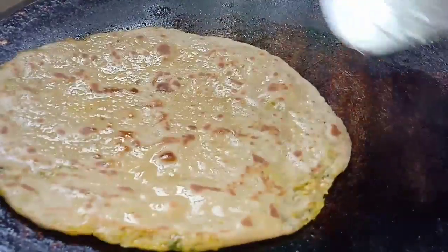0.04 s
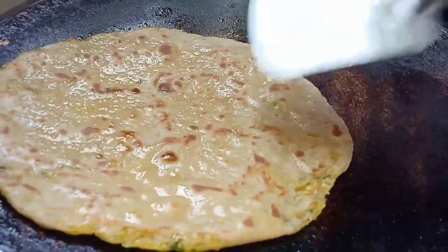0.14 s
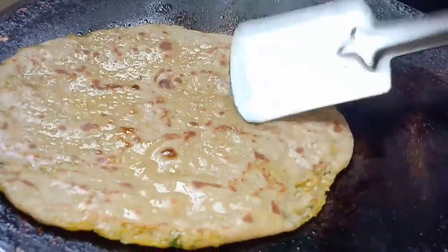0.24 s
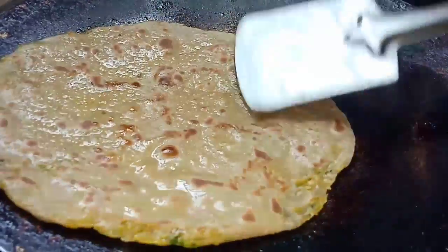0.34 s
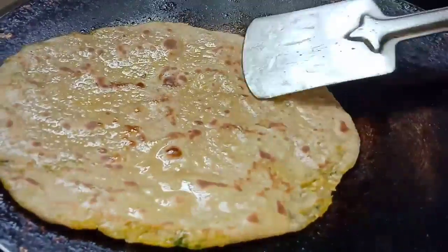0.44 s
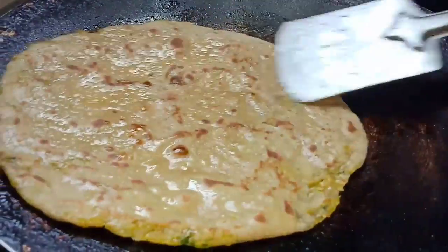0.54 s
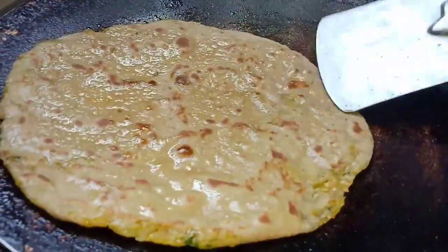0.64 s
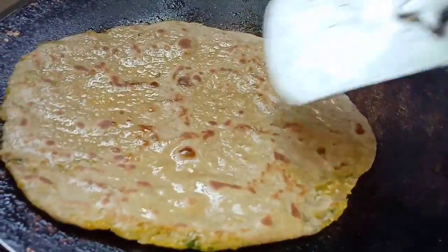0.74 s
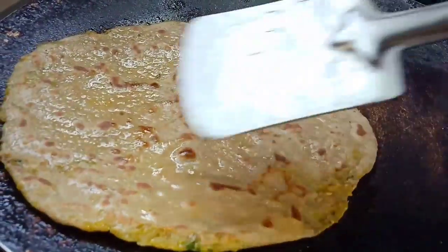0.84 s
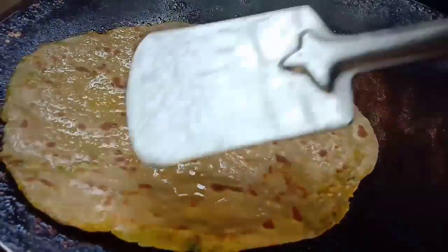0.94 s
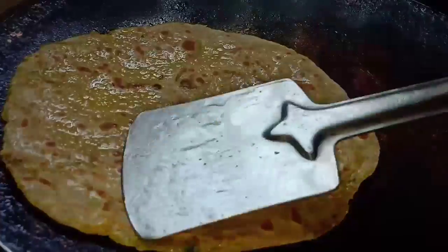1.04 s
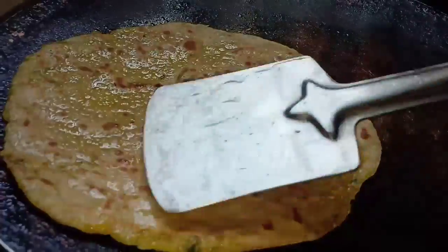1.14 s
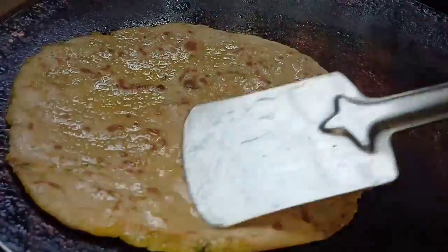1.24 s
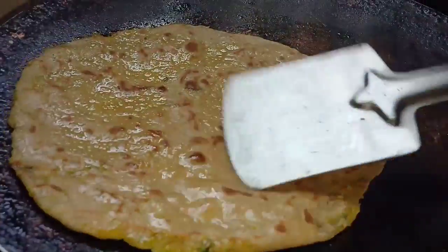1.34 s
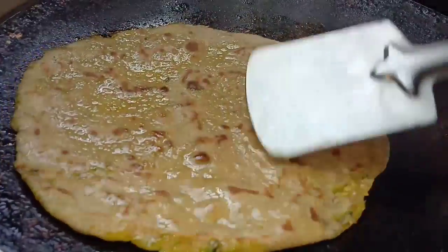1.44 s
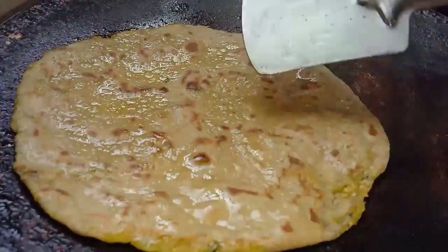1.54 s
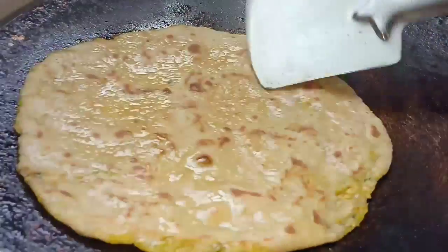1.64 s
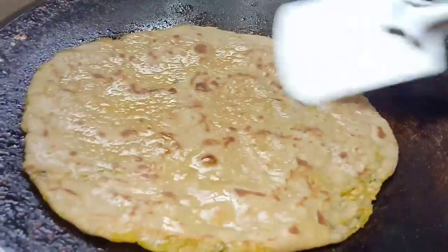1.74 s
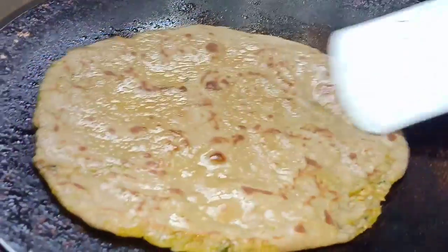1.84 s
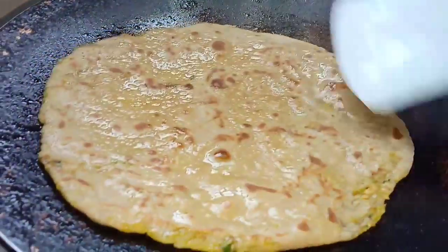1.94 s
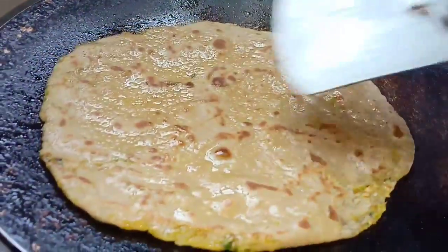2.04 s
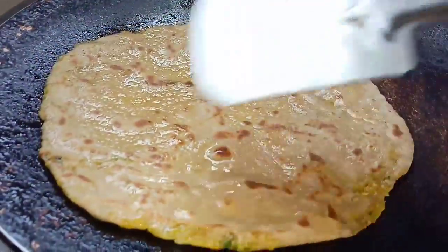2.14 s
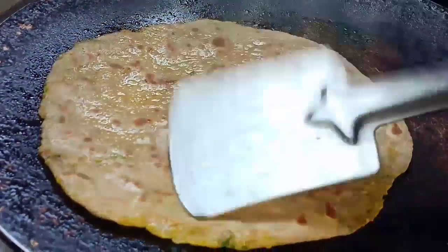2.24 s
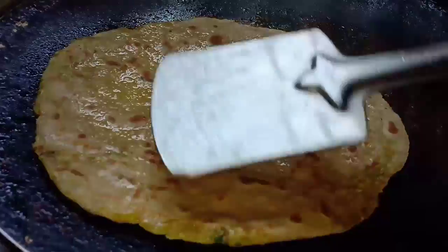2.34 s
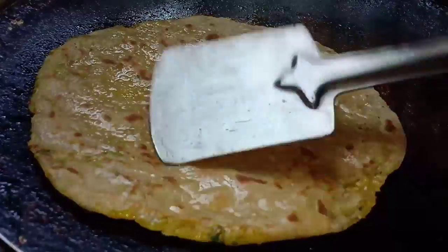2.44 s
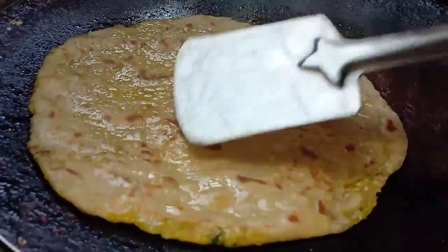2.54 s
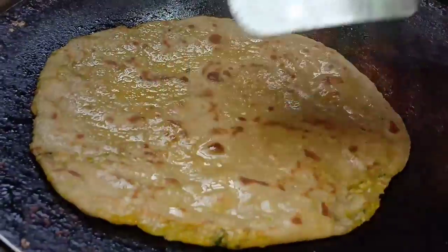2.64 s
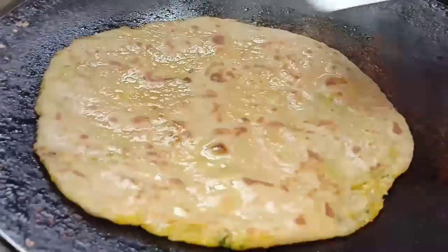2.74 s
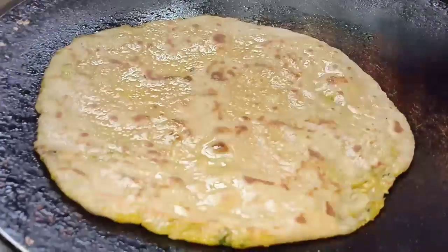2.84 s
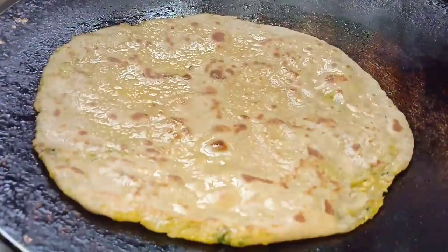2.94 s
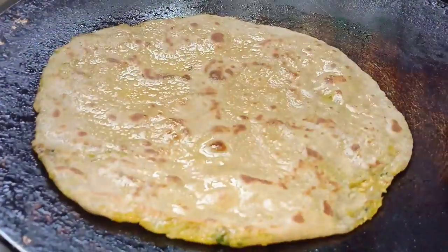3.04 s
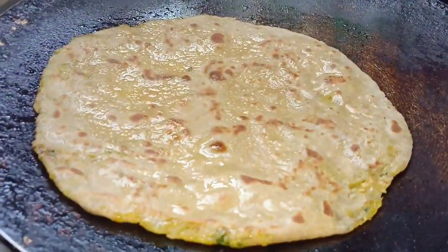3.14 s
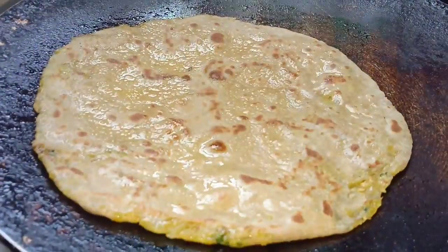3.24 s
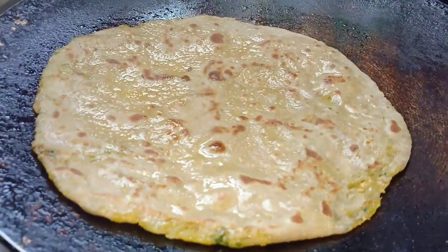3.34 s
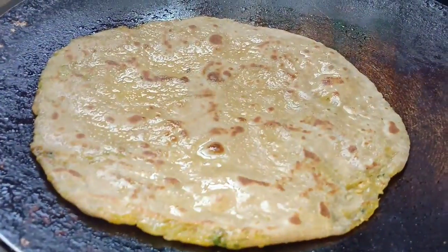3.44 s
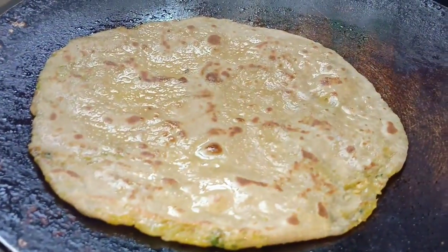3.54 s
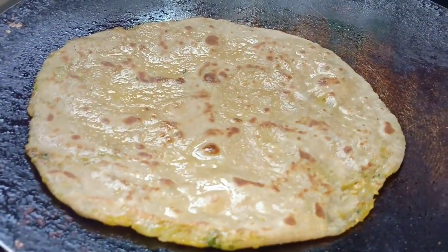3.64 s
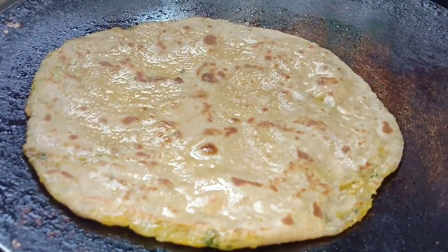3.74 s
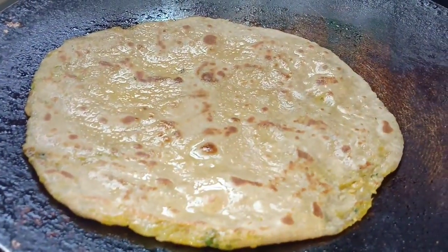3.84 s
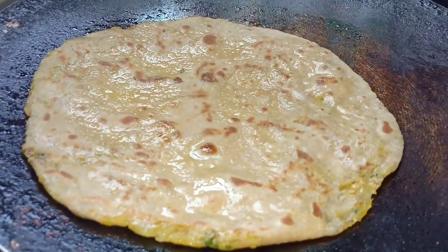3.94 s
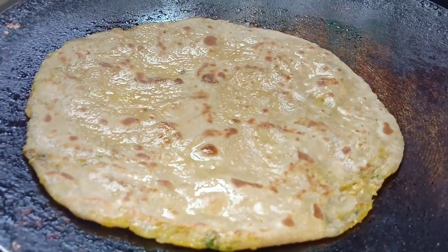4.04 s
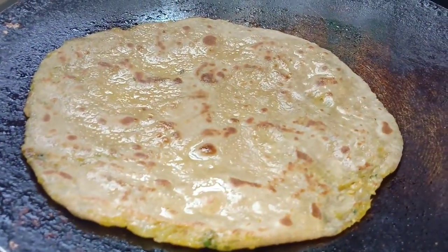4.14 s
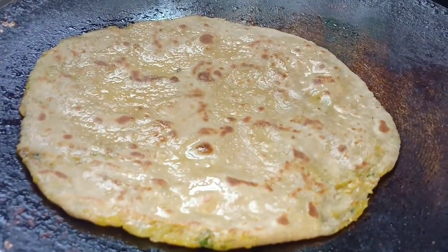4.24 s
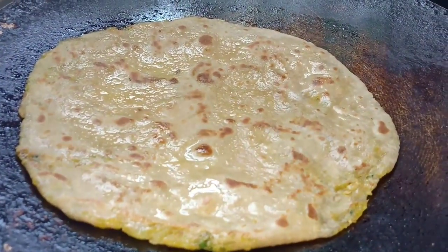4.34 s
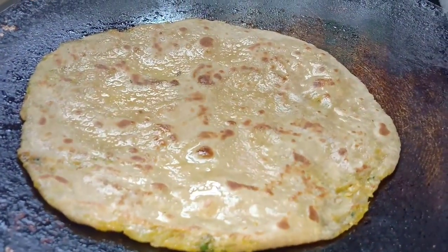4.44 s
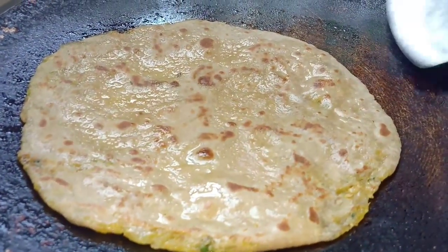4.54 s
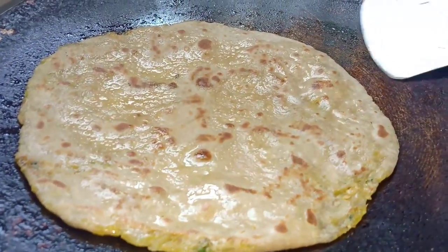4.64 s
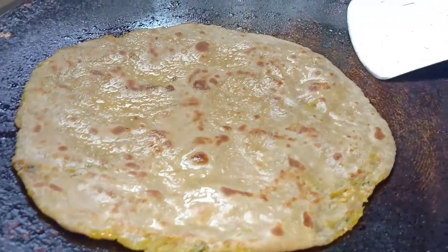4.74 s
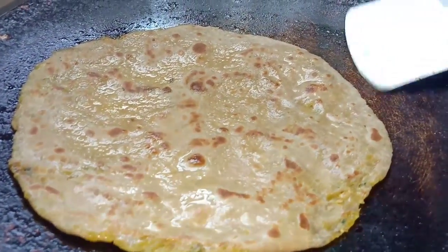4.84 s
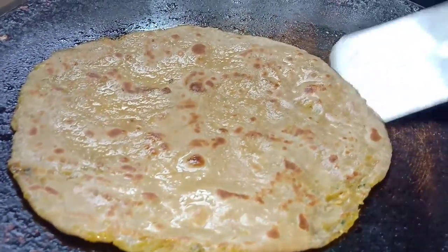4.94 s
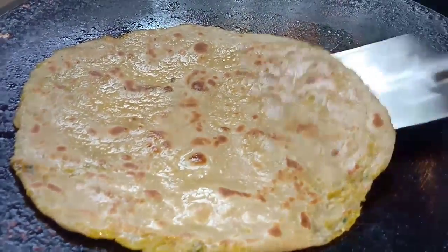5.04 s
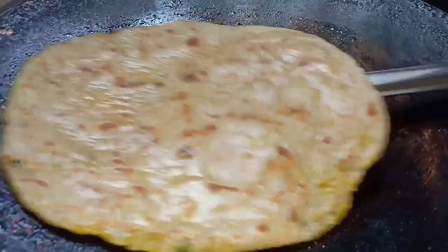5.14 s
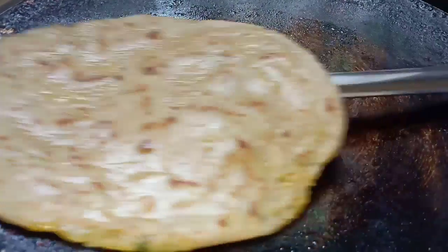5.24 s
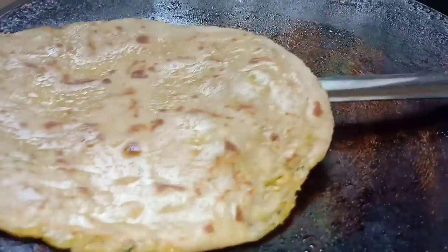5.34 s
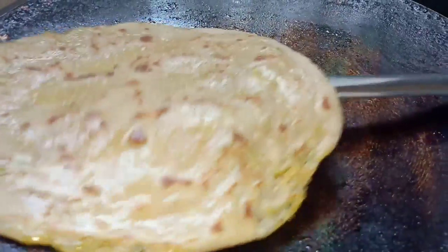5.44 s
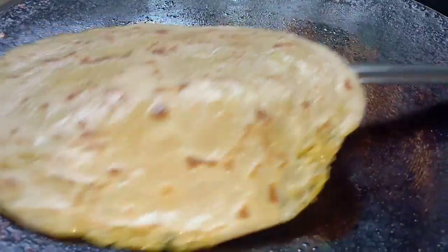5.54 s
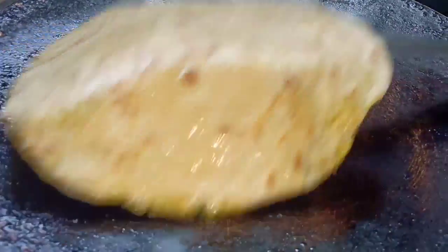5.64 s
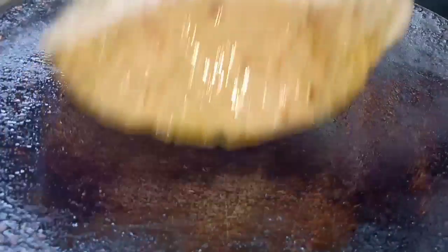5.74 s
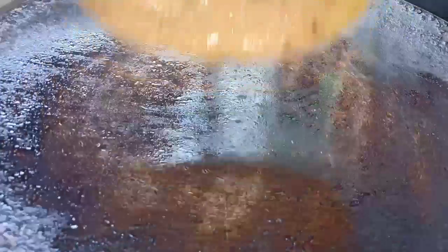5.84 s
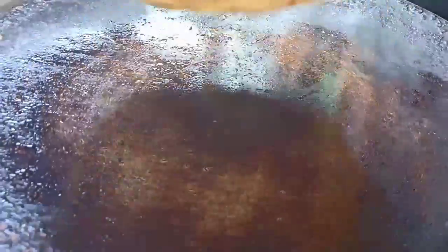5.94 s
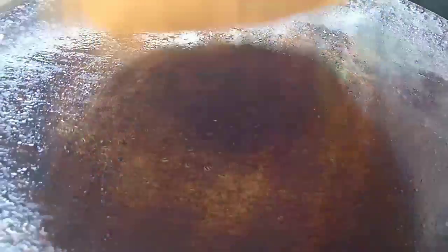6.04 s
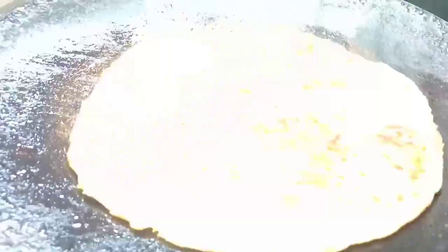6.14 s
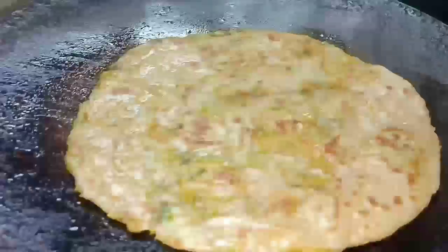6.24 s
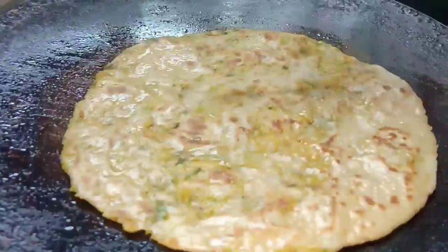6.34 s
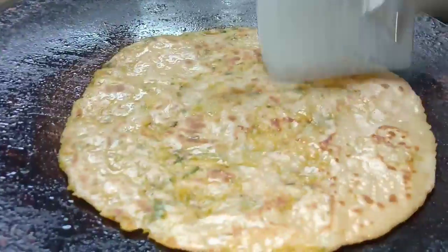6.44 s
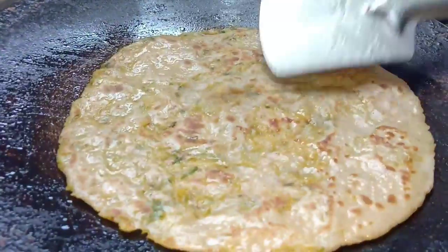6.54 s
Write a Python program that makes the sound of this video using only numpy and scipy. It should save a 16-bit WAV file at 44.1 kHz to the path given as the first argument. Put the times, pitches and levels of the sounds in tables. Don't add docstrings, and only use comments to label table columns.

```python
import sys
import numpy as np
from scipy import signal
from scipy.fft import rfft, irfft
from scipy.io import wavfile
from scipy.ndimage import uniform_filter1d

SR = 44100
rng = np.random.default_rng(int(sys.argv[2]) if len(sys.argv) > 2 else 0)


def gain_from_db(level_db):
    decades = np.asarray(level_db, float) / 20
    return 10 ** decades


def wav_out(sig):
    wavfile.write(sys.argv[1], SR, np.round(np.clip(np.atleast_2d(sig).T, -1, 1) * 32767).astype(np.int16))


N = 290178

# start in seconds, peak in dB, dull over bright part in dB, dull pitch in Hz.
PAT_HITS = [(0.023, -50, 10, 1040), (0.1592, -36.5, -7, 996), (0.1695, -36, -12, 1070),
            (0.3563, -24.5, -4.5, 2300), (0.9197, -26, -7, 1270), (1.096, -39, -7, 1730),
            (1.1038, -33, 2.5, 830), (1.2584, -35.5, 2.5, 647), (1.2639, -28.5, -1, 820),
            (1.3445, -31.5, -6, 1400), (1.543, -42, 3.5, 1080), (2.165, -21, -7, 1410),
            (2.3732, -24.5, 2.5, 1023), (2.389, -37, 9, 795), (2.4388, -35, -3, 640),
            (4.555, -16.5, -18, 2600), (5.3146, -19, -14.5, 1520), (5.345, -33, -2, 1900),
            (5.985, -11.5, -10, 900), (6.0054, -12, -11, 1400), (6.0131, -13, -4, 1500),
            (6.359, -36.5, -6, 1970), (6.5622, -28, -9, 2500)]
# mode in Hz, level in dB, t60 in seconds.
BLADE_MODES = [(1840, -11, 0.082), (2260, -23, 0.22), (2588, -10, 0.18), (3300, -5.5, 0.081),
               (3440, -11, 0.11), (4073, -5.5, 0.073), (5080, -22.5, 0.098), (6450, -18, 0.13),
               (7300, -22, .08), (8290, -7, 0.054), (9200, -24, .08), (10320, -24, 0.066),
               (13450, -30, 0.071), (14540, -26, .08)]
# frequency in Hz, density in dB per Hz.
CONTACT_SPECTRUM = [(180, -40), (300, -11.5), (500, -8), (750, -6), (1300, -5.5), (2000, 1.5), (3500, -2),
                    (4300, -9), (5500, -21), (7600, -12.5), (9500, -23), (12000, -25.5), (16000, -48)]
# full pressure at seconds, hold in seconds, level in dB,
# dull share in dB, fade in dB per second. First short skids after a pat:
SKID_STROKES = [(0.172, 0.0024, -42.5, 7.5, 800), (0.366, 0.014, -38.5, 2, 113),
                (0.932, .002, -39.5, 3, 122), (1.096, .002, -40, -2.5, 79), (2.18, 0.004, -38, 3.5, 222),
                (2.372, .002, -47, -28, 305), (5.32, 0.002, -30.5, -24, 1200), (5.335, .01, -40, -5.5, 30)]
DRAG_STROKES = [(0.41, 0.022, -49, -10, 150), (0.49, 0.05, -38.5, -9, 500), (0.57, 0.046, -58, -24, 300),
                (1.33, 0.023, -42, -6, 370), (1.666, 0.081, -37.5, -6, 190), (1.866, .002, -50, -13, 500),
                (1.965, 0.0075, -42, -4, 900), (2.43, 0.083, -51, -15, 120)]
NUDGE_STROKES = [
    (0.021, 0.037, -44, 5.5, 200),
    (0.06, 0.015, -53, 0, 123),
]
FLIP_STROKES = [
    (5.984, 0.016, -23, -21, 500),
    (6.012, 0.019, -28.5, 8, 1198),
    (6.035, .01, -55, 13, 150),
    (6.366, .002, -49, -27, 750),
]
# time in seconds, scrape in dB.
SLIDE_LEVEL = [(4.58, -36), (4.666, -68), (4.705, -49), (4.74, -40), (4.924, -28), (4.96, -27.5),
               (5.02, -24), (5.1, -28.5), (5.17, -33.5), (5.28, -78)]
# start in seconds, peak in dB.
EDGE_CATCHES = [(4.712, -30), (4.7254, -25), (4.7404, -24), (4.755, -23), (4.7674, -33), (4.7804, -26),
                (4.8032, -20), (4.8225, -16), (4.8575, -20), (4.9074, -34), (4.9302, -24), (4.946, -15),
                (4.9597, -15), (4.9713, -14), (5.0001, -11.5), (5.0112, -9.5), (5.0512, -7), (5.0937, -22),
                (5.124, -33)]
# time in seconds, lowest pan mode awake in Hz.
BLADE_REACH = [(4.58, 1870), (4.669, 2500), (4.695, 3900), (4.73, 3100), (4.8, 2080), (4.89, 1680),
               (4.95, 614), (5.15, 563), (5.3, 1300)]
# mode in Hz, width in Hz, level in dB,
# best contact at seconds, contact length in seconds.
PAN_MODES = [(517, 37, 9, 5.06, 0.082), (636, 55, -3, 5.1, 0.094), (761, 19, -6.5, 5.0, 0.078),
             (960, 31, -4.5, 5.1, 0.05), (1270, 78, -4, 4.99, 0.061), (1445, 49, 5.5, 5.1, 0.065),
             (1746, 57, 8.5, 5.0, 0.032), (1995, 91, -2.5, 5.07, 0.14), (2248, 54, 11, 4.96, 0.04),
             (2264, 30, -4, 4.85, 0.069), (4560, 42, -17, 4.96, .04), (3640, 40, -2, 5.05, .05),
             (3610, 50, 3, 4.96, 0.017), (2447, 70, 11, 5.13, 0.023), (2570, 41, 8, 5.04, 0.024),
             (2650, 62, 5.5, 4.83, 0.04), (2990, 28, -4, 4.9, 0.083), (3270, 43, 8, 5.14, 0.064),
             (3360, 110, 4.5, 4.77, 0.027), (3640, 90, 7, 5.01, 0.027), (3880, 25, -7, 5.03, .08),
             (4110, 69, -1, 4.8, 0.22), (4280, 30, 0.5, 4.96, 0.044), (4190, 41, -10.5, 5.07, 0.044),
             (5150, 29, -12, 4.78, .03), (6950, 40, -13, 4.86, .06), (8100, 44, -6.5, 4.85, 0.058),
             (6030, 78, -13, 5.06, 0.065), (9000, 60, -18, 5.05, .05), (7490, 60, -13, 4.95, 0.036),
             (7490, 52, -12, 5.02, 0.054), (9200, 50, -26, 4.95, 0.14), (3100, 56, -5.5, 5.0, 0.076)]
# start in seconds, level in dB, pitch in Hz, t60 in seconds.
LANDING_SMACKS = [(5.9588, -26, 3270, .012), (5.9632, -28, 3300, .012), (5.9735, -26, 1800, .02),
                  (5.9805, -13, 3450, .008), (5.9832, -7, 3670, .006), (5.9835, -14, 1100, .012),
                  (5.9858, -7, 3600, .016), (5.9912, -7, 3600, .007), (5.9915, -16, 700, .015),
                  (5.994, -10, 4000, .012), (5.9958, -11, 3500, .016), (6.0013, -11, 3500, .011),
                  (6.0015, -16, 750, .015), (6.0058, -10, 3500, .016), (6.0095, -9, 3650, .014),
                  (6.0104, -8, 1000, .008), (6.0138, -1.5, 800, .014), (6.0142, -8, 1250, .014),
                  (6.0145, -10, 3200, .015), (6.0175, -12, 1400, .02), (5.986, -17, 1500, .012),
                  (6.021, -12, 720, .03), (5.989, -15, 4150, .03), (5.999, -14, 4150, .03),
                  (6.0138, -11, 4250, .012), (6.0145, -15, 2600, .04), (6.02, -21, 4120, .06),
                  (5.984, -18, 4800, .015), (6.004, -18, 2650, .02), (6.03, -21, 3550, .06),
                  (6.032, -19, 900, .03)]
# start in seconds, level in dB, pitch in Hz, t60 in seconds.
CLINKS = [(0.074, -33, 870, .05), (0.17, -29, 1080, .025), (0.3583, -26, 1680, .04),
          (0.3583, -24.5, 690, .04), (0.3583, -22, 4000, .008), (0.3625, -26, 2300, .02),
          (0.384, -31, 2330, .02), (0.37, -32, 1800, .2), (0.372, -32, 750, .08),
          (0.432, -34, 1750, .08), (0.359, -27, 2440, .04), (0.378, -34, 2400, .05),
          (0.919, -28.5, 666, .036), (0.919, -32, 1350, .04), (0.9192, -27, 1100, .006),
          (2.167, -35, 3400, .08), (2.374, -35, 3300, .08), (1.345, -38, 4100, .16),
          (1.62, -47, 8290, .15), (6.062, -21, 3200, .003), (6.05, -33, 277, .6),
          (6.04, -30, 1850, .2), (2.813, -35, 2000, .005), (3.945, -35, 2000, .005),
          (0.949, -34, 350, .06), (0.919, -30, 900, .02), (2.166, -29, 600, .04),
          (2.166, -31, 2850, .03), (2.3728, -22, 1500, .004), (2.373, -29, 790, .067),
          (4.556, -27, 3320, .05), (4.556, -33, 3900, .04), (4.558, -31, 2560, .05),
          (4.558, -34, 2150, .06), (4.558, -36, 1130, .05), (4.556, -36, 8260, .06),
          (4.556, -37, 6570, .05), (4.556, -47, 14540, .08), (4.606, -37, 2030, .08),
          (5.3165, -21, 3300, .045), (5.317, -22, 1816, .045), (5.317, -20, 2530, .045),
          (5.317, -29, 4150, .04), (5.342, -28, 1867, .06), (5.372, -35, 2700, .05),
          (5.415, -36, 1830, .06)]
# start in seconds, peak in dB.
SPIT_BURSTS = [(0.1004, -36), (0.4308, -18), (1.23, -26), (1.84, -24), (1.8465, -19), (1.8622, -17),
               (1.867, -17), (1.8692, -22), (1.681, -32), (1.724, -24), (1.756, -24), (1.773, -28),
               (1.9609, -38), (1.976, -38), (2.4953, -26.5), (3.158, -30), (4.918, -27), (4.988, -26),
               (5.105, -22), (5.205, -25), (5.2734, -39), (5.3035, -19), (5.319, -35), (5.3347, -19),
               (5.347, -19), (5.422, -25), (5.5108, -28.5), (5.5924, -26), (5.6398, -29), (5.905, -36),
               (5.9172, -28), (5.9588, -24), (5.9805, -20), (5.989, -5), (6.073, -28), (6.0775, -28),
               (6.09, -30), (6.1, -30), (5.9923, -17), (5.996, -14), (6.0015, -8), (6.006, -12),
               (6.0123, 1), (6.0615, -7.5), (6.204, -32)]
# frequency in Hz, density in dB per Hz.
SPIT_SPECTRUM = [(1000, -28), (3500, 12), (5500, -10), (8000, 3.5), (11000, -7.5), (16000, -5)]
# start in seconds, peak in dB, knock near 1 kHz in dB.
COUNTER_THUDS = [
    (2.812, -14.5, -14.5),
    (3.944, -14.5, -15.5),
    (6.055, -16, -8.5),
    (6.361, -45, -11),
]
# mode in Hz, level in dB, t60 in seconds.
COUNTER_MODES = [(313, -21, 0.011), (465, -4, 0.14), (645, -7, 0.016), (820, 1, 0.013), (1095, 12, 0.023),
                 (1500, -3, 0.017), (1730, 7, 0.0091), (2150, -5, 0.0089), (2720, -2, .01)]
# mode in Hz, level in dB, t60 in seconds.
ROOM_MODES = [(98.1, -2, 0.85), (123.3, -8, 0.75), (139.5, 2, 0.57), (167, -8.5, 0.65), (210.6, -7, 0.41),
              (246.4, -9.5, 0.37), (277.3, -9, 0.41)]
# mode in Hz, level in dB, t60 in seconds.
REBOUND_MODES = [(225, -11, 0.44), (291.5, -2.5, 0.25)]
# mode in Hz, level in dB, t60 in seconds.
STOVE_MODES = [(135, -88, 0.25), (271, -41.5, 0.34), (283, -51.5, 0.66), (414, -43, 0.038)]
ROCKING_STROKES = [(0.06, 0.013, -40.5, 0, 117), (0.36, 0.031, -47, 0, 193), (0.96, 0.019, -44, -2, 152),
                   (1.93, 0.034, -52, 0, 150), (5.33, 0.023, -46.5, 6, 150), (6.06, 0.064, -53, 0, 120),
                   (6.37, 0.03, -50.5, 0, 152), (6.565, 0.023, -47, 0, 147)]
# time in seconds, pitch in Hz, level in dB.
STEAM_WHISTLES = [
    [(0.6, 6800, -85), (1.2, 7100, -63), (1.9, 6900, -63), (2.5, 7050, -62), (3.1, 7320, -63)],
    [(2.5, 2420, -56), (3.1, 2504, -60), (3.6, 2570, -63), (4.1, 2630, -54), (4.55, 2770, -60)],
    [(0.62, 4680, -66), (0.87, 4650, -68)],
    [(0.8, 5150, -66), (1.4, 5280, -72)],
    [(2.8, 3270, -65), (3.2, 3310, -60), (4.5, 3270, -63)],
]
# time in seconds, hiss in dB.
FRYING_LEVEL = [(0.0, -48), (2.53, -47.5), (4.6, -48), (4.8, -45.5), (5.0, -35), (5.42, -46.5), (5.7, -50),
                (5.96, -52), (6.12, -39.5), (6.32, -50), (6.58, -50.5)]
# frequency in Hz, density in dB per Hz.
HISS_SPECTRUM = [(180, -44), (300, -18.5), (500, -4), (1000, -3.5), (1800, -2.5), (2700, -3), (4000, -4.5),
                 (4700, -13.5), (5500, -20), (7600, -11), (9000, -19.5), (10500, -24), (13000, -24),
                 (16000, -25)]
# frequency in Hz, density in dB per Hz.
RUMBLE_SPECTRUM = [(12, -21), (20, 12), (27, 5), (53, -63), (81, 0), (135, 5), (153, -2.5), (173, -4),
                   (258, -5.5), (304, -13), (500, -8.5), (650, -47), (1100, -120)]
# time in seconds, level in dB.
STOVE_SHAKES = [(0.06, -54), (0.97, -74), (2.33, -59), (5.34, -85), (6.1, -50.5), (6.4, -80), (6.57, -74)]
# frequency in Hz, t60 in seconds.
KITCHEN_T60 = [(200, 0.27), (1000, 0.66), (4000, 0.52), (12000, 0.013)]


def rms_one(x):
    return x / np.sqrt(np.mean(x ** 2) + 1e-20)


def in_time(rows):
    s, db = np.transpose(rows)
    gain = gain_from_db(np.interp(np.arange(N) / SR, s, db, left=-140, right=-140))
    return uniform_filter1d(gain, size=200)


def colour(x, spectrum):
    hz = np.maximum(np.fft.rfftfreq(8192, 1 / SR), 1)
    points = np.array(spectrum)
    level_db = np.interp(np.log(hz), np.log(points[:, 0]), points[:, 1])
    cepstrum = irfft(np.log(gain_from_db(level_db)))
    cepstrum[1:4096] *= 2
    cepstrum[4097:] = 0
    response = irfft(np.exp(rfft(cepstrum)))[:4096]
    return signal.fftconvolve(x, response / np.linalg.norm(response))[:N]


def split(x, hz, kind):
    return signal.sosfilt(signal.butter(2, hz, kind, fs=SR, output="sos"), x)


def ring(clicks, hz, t60):
    r, w = gain_from_db(-60 / (t60 * SR)), 2 * np.pi * hz / SR
    return signal.lfilter([0, np.sin(w)], [1, -2 * r * np.cos(w), r * r], clicks + 1e-18)


def ring_modes(force, modes):
    return sum(gain_from_db(level_db) * ring(force, hz, t60) for hz, level_db, t60 in modes)


def drift(rate):
    r = np.exp(-2 * np.pi * rate / SR)
    return rms_one(signal.lfilter([1], [1, -2 * r, r * r], rng.standard_normal(N + SR))[SR:])


def grains(per_s, spread_db):
    sizes = gain_from_db(spread_db * np.minimum(rng.exponential(1, N), 4)) * rng.choice([-1, 1], N)
    return rms_one(sizes * (rng.random(N) < per_s / SR))


def bursts(rows, noise):
    out = np.zeros(N)
    for s, gain, t60, rise in rows:
        at = round(s * SR)
        age = np.arange(min(int((t60 + rise) * SR) + 2, N - at)) / SR
        shape = np.minimum(age / rise, 1) * gain_from_db(-60 * np.maximum(age - rise, 0) / t60)
        out[at:at + len(age)] += gain * shape * noise[at:at + len(age)]
        out[at] += 8.8 * gain * np.exp(-rise / 0.0089)
    return out


def strokes(rows, rise):
    t, level, dull = np.arange(N) / SR, 0, 0
    for s, hold, db, dull_db, fade in rows:
        shape = gain_from_db(db - rise * np.maximum(s - t, 0) - fade * np.maximum(t - s - hold, 0))
        level = level + shape
        dull = dull + gain_from_db(dull_db) * shape
    return level, dull


def pats():
    chatter = grains(12000, spread_db=6.5)
    s, db, dull_db, dull_hz = np.transpose(PAT_HITS)
    t60 = 0.075 * np.exp(-0.078 * (dull_db + 11.5))
    loaded = (s > 4.5) & (s < 6.2)
    ring_db = np.where(loaded, -24, -10)
    rise = np.full(len(s), .0008)
    out = split(bursts(zip(s, gain_from_db(db - 1), 0.64 * t60, rise), chatter), 3050, "high")
    for row, hz in zip(zip(s, gain_from_db(db + dull_db + 6.0), t60, rise), dull_hz):
        start = round(row[0] * SR)
        at = slice(start, start + SR // 4)
        out[at] += split(bursts([row], chatter)[at], [hz / 3.3, hz * 1.28], "band")
    out = colour(out, CONTACT_SPECTRUM)
    uneven_db = 2 * rng.standard_normal((len(s), len(BLADE_MODES)))
    for (hz, level_db, ring_t60), luck_db in zip(BLADE_MODES, uneven_db.T):
        clicks = np.zeros(N)
        clicks[np.round((s + rise) * SR).astype(int)] = gain_from_db(db + ring_db + level_db + luck_db)
        out += ring(clicks, hz, 0.96 * ring_t60)
    return out


def rubbing(pressure, per_s, ring_db=None, edge_hz=1500, dull_hz=1400, spread_db=2.5):
    level, dull = pressure
    friction = grains(per_s, spread_db) * gain_from_db(1.3 * drift(90))
    bright_part = level * split(friction, edge_hz, "high")
    dull_part = 2.17 * dull * split(friction, dull_hz, "low")
    body = colour(bright_part + dull_part, CONTACT_SPECTRUM)
    if ring_db is None:
        return body
    return body + gain_from_db(ring_db) * ring_modes(level * friction, BLADE_MODES)


def sliding():
    span = slice(int(4.5 * SR), int(5.6 * SR))
    t = np.arange(N) / SR
    reach_hz = np.interp(t, *np.transpose(BLADE_REACH))
    load = gain_from_db(-3.5 - 21 * np.log2(reach_hz / reach_hz.min()))
    grit = grains(7000, spread_db=1.5)
    caught = bursts([(s, gain_from_db(db - 14), 0.032, .0015) for s, db in EDGE_CATCHES], grit)
    friction = in_time(SLIDE_LEVEL) * grit * gain_from_db(1.0 * drift(70)) + caught
    scrape = split(friction, 3400, "high") + 1.43 * load * split(friction, 2100, "low")
    out = gain_from_db(-8.5) * colour(scrape, CONTACT_SPECTRUM)
    wander = [drift(30.0)[span] for _ in range(5)]
    friction, t, reach_hz = friction[span], t[span], reach_hz[span]
    out[span] += gain_from_db(-46) * split(ring_modes(friction, BLADE_MODES), 6000, "high")
    for k, (hz, width_hz, level_db, best_s, lasts) in enumerate(PAN_MODES):
        r = np.exp(-np.pi * .75 * width_hz / SR)
        contact_db = 8 * np.exp(-((t - best_s) / lasts) ** 2) + 1.5 * wander[k % 5]
        drive = friction * gain_from_db(contact_db) / (1 + (reach_hz / hz) ** 11.6)
        poles = [1, -2 * r * np.cos(2 * np.pi * hz / SR), r * r]
        out[span] += (-1) ** k * gain_from_db(level_db + 6) * signal.lfilter([1 - r, 0, r - 1], poles, drive)
    return out


def landing():
    out, click = np.zeros(N + SR), np.eye(1, SR // 5)[0]
    for s, db, hz, t60 in LANDING_SMACKS + CLINKS:
        out[round(s * SR):][:SR // 5] += gain_from_db(db) * ring(click, hz, t60)
    return split(out[:N], 110, "high")


def spits():
    fizz, out = rng.standard_normal(N), np.zeros(N)
    for s, db in SPIT_BURSTS:
        at = round((s + 0.0012) * SR)
        burst = 0.2 * fizz[at:at + 400] * gain_from_db(-60 * np.arange(400) / SR / 0.004)
        burst[:2] += [-1, -.3]
        out[at:at + 400] += gain_from_db(db + 3.0) * split(burst, 3500, "high")
    faint = gain_from_db(-67) * split(grains(21, spread_db=2.0), 7000, "high")
    return colour(out + faint, SPIT_SPECTRUM)


def thuds():
    push, rattle = np.zeros(N), []
    for s, db, knock_db in COUNTER_THUDS:
        push[round((s - .0022) * SR)] = 0.37 * gain_from_db(db)
        push[round((s + .0004) * SR)] = -gain_from_db(db)
        rattle.append((s - 0.0012, gain_from_db(db + knock_db - 30.5), .05, .005))
    knock = bursts(rattle, grains(3000, spread_db=4.5))
    wood = ring_modes(knock, COUNTER_MODES)
    blow = 2.68 * ring(split(push, 740, "low"), 108, 0.016)
    late = np.roll(split(push, 570, "low"), round(0.01494 * SR))
    rebound = np.roll(split(push, 470, "low"), round(0.058 * SR))
    answer = ring_modes(late, ROOM_MODES) + ring_modes(rebound, REBOUND_MODES)
    return split(blow + gain_from_db(-19.5) * answer, 116, "high") + wood


def rocking():
    level, _ = strokes(ROCKING_STROKES, rise=510)
    shudder = split(grains(1500, spread_db=6.0), [210, 420], "band")
    return level * rms_one(split(shudder, [180, 500], "band"))


def whistles():
    out, t = np.zeros(N), np.arange(N) / SR
    for rows in STEAM_WHISTLES:
        s, hz, db = np.transpose(rows)
        gain = gain_from_db(np.interp(t, s, db, left=-120, right=-120) + 1.5 * drift(5))
        pitch_hz = np.interp(t, s, hz) + 9 * drift(13.7)
        out += gain * np.sin(2 * np.pi * np.cumsum(pitch_hz) / SR)
    return out


def frying():
    shakes = [(s, 0, db, 0, 47) for s, db in STOVE_SHAKES]
    rumble = gain_from_db(-52.5) + strokes(shakes, rise=91)[0]
    flame = rng.standard_normal(N)
    boom = sum(gain_from_db(level_db) * rms_one(ring(flame, hz, 0.46 * t60)) for hz, level_db, t60 in ROOM_MODES)
    low = colour(rng.standard_normal(N), RUMBLE_SPECTRUM) + gain_from_db(-4.0) * boom
    fizz = rng.standard_normal(N) + 0.17 * grains(2000, spread_db=11.0)
    hiss = in_time(FRYING_LEVEL) * gain_from_db(.5 * drift(14.0)) * colour(fizz, HISS_SPECTRUM)
    return hiss + rumble * gain_from_db(0.52 * drift(5.4)) * low


def kitchen(x):
    age = np.arange(SR // 2) / SR
    tail, table = 0, np.array(KITCHEN_T60)
    for hz in 90 * 2. ** np.arange(8):
        octave = signal.butter(1, [hz / 1.41, hz * 1.41], "band", fs=SR, output="sos")
        band = signal.sosfilt(octave, rng.standard_normal(len(age)))
        t60 = np.interp(np.log(hz), np.log(table[:, 0]), table[:, 1])
        tail = tail + band * gain_from_db(-60 * age / t60)
    tail *= np.clip(age / 0.0012, 0, 1)
    return signal.fftconvolve(x, tail / np.linalg.norm(tail))[:N]


def scene():
    skids = rubbing(strokes(SKID_STROKES, rise=510), 9000, ring_db=-37.5)
    drags = rubbing(strokes(DRAG_STROKES, rise=115), 9000, ring_db=-37, edge_hz=1400, dull_hz=2100)
    nudges = split(rubbing(strokes(NUDGE_STROKES, rise=5600), 8000, dull_hz=1900), 4000, "low")
    rubs = gain_from_db(-1.0) * (skids + drags) + nudges
    slap = rubbing(strokes(FLIP_STROKES, rise=420), 5000, edge_hz=3400, dull_hz=1280, spread_db=3.5)
    knocks = pats() + rubs + split(slap, [1500, 2500], "bandstop")
    stove = ring_modes(split(knocks, 830, "low"), STOVE_MODES)
    near = knocks + sliding()
    close = spits() + thuds() + landing()
    echo = gain_from_db(-9.5) * kitchen(near) + gain_from_db(-20) * kitchen(close)
    return (near + stove + close + echo + frying() + whistles() + rocking())[None]


def roll_off(x):
    return signal.sosfilt(signal.butter(12, 16430, fs=SR, output="sos"), x)


def record(dry):
    top_cut = signal.cheby2(18, 45, 15750, fs=SR, output="sos")
    band = signal.sosfilt(top_cut, split(dry, 60, "high"))
    rounded = 1.342 * np.tanh(band / 1.645)
    mix = split(rounded, 31, "high") - .0009
    return roll_off(mix)


dry = scene()
out = record(dry)
wav_out(out)
```